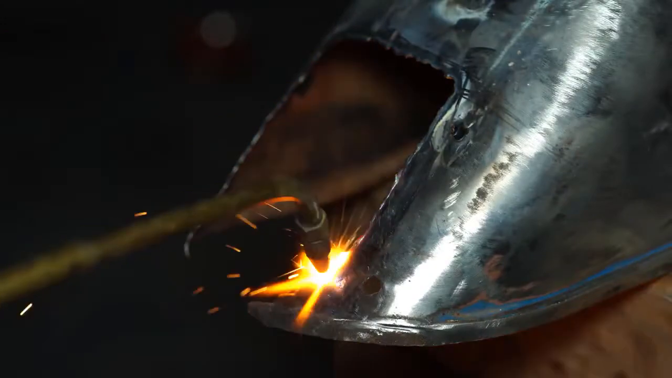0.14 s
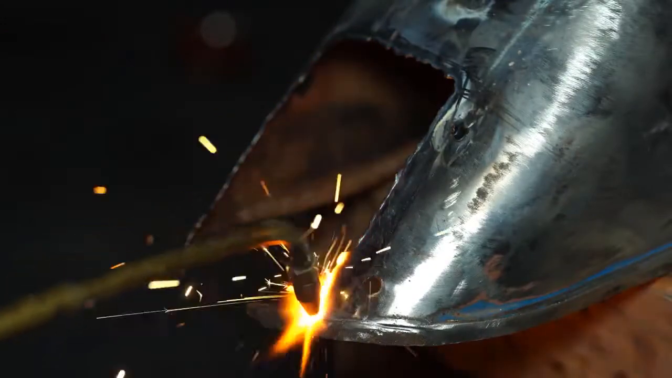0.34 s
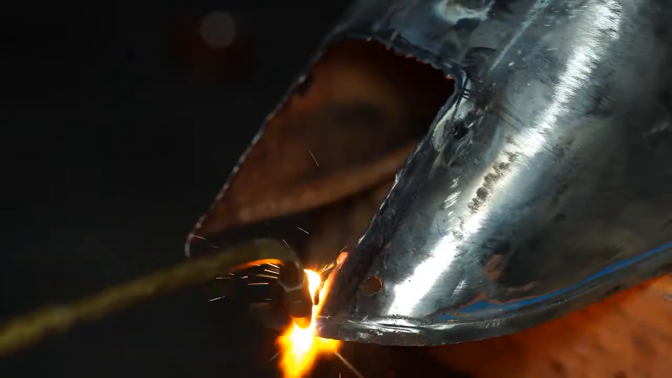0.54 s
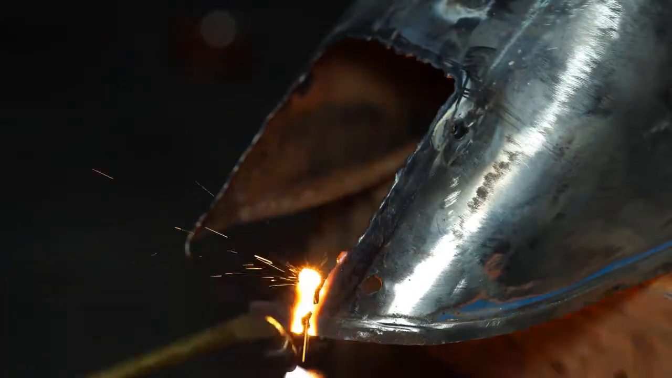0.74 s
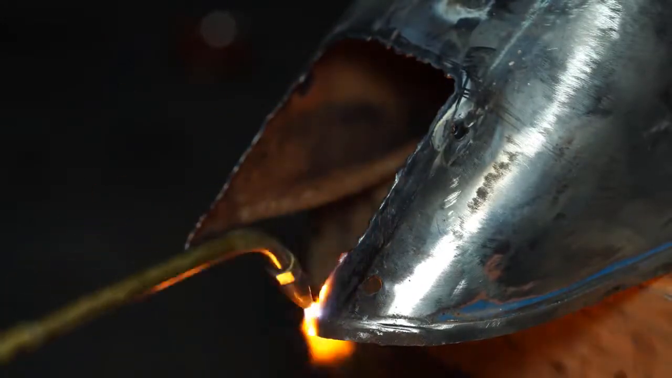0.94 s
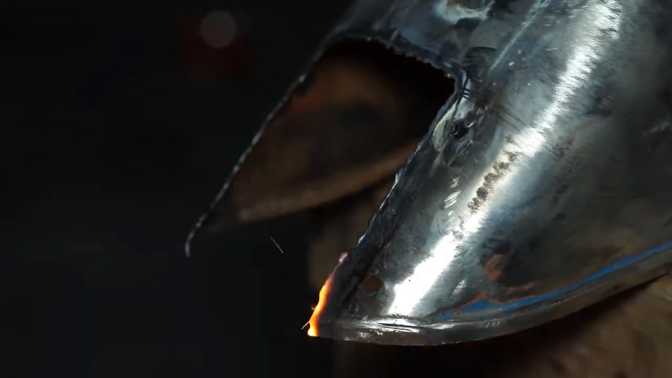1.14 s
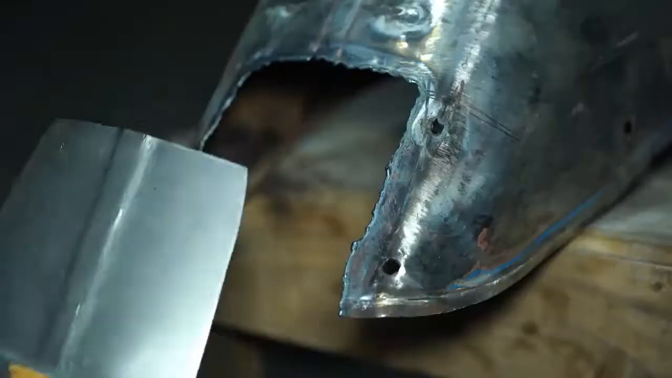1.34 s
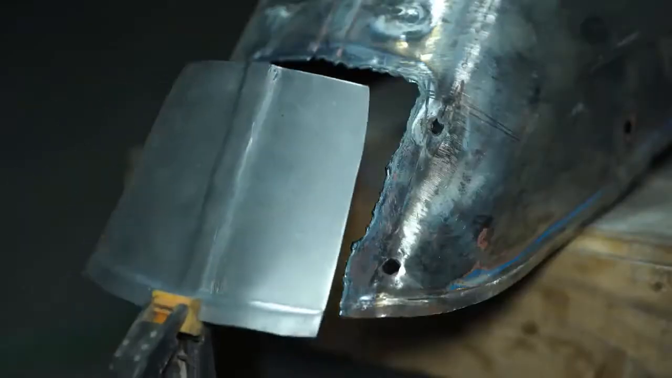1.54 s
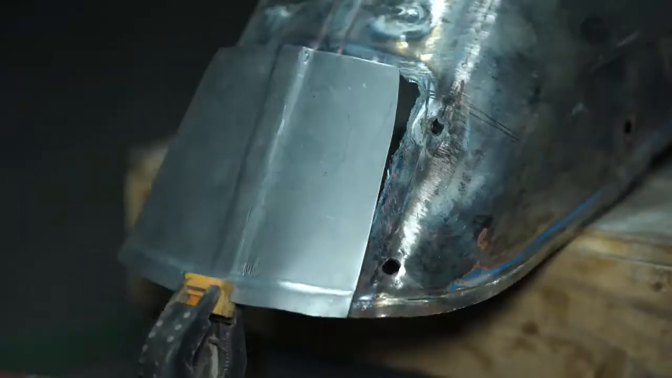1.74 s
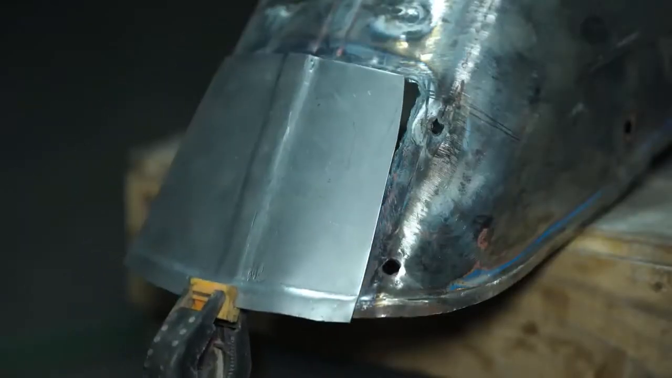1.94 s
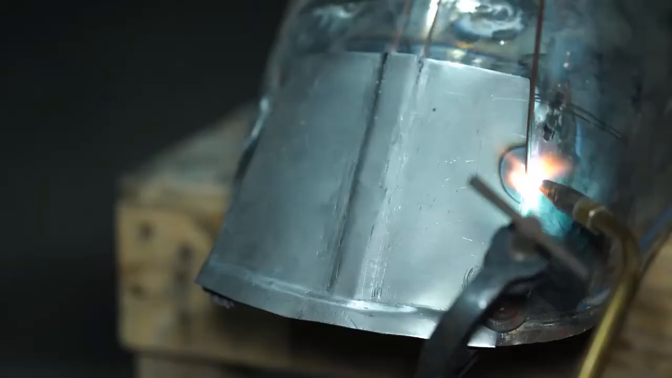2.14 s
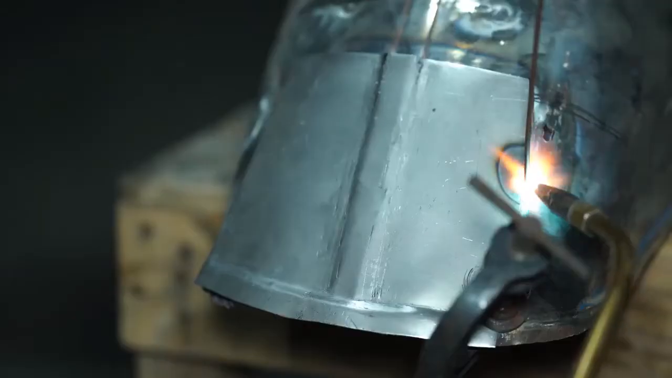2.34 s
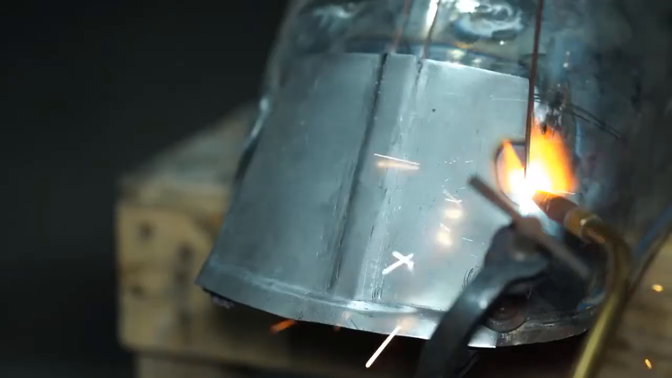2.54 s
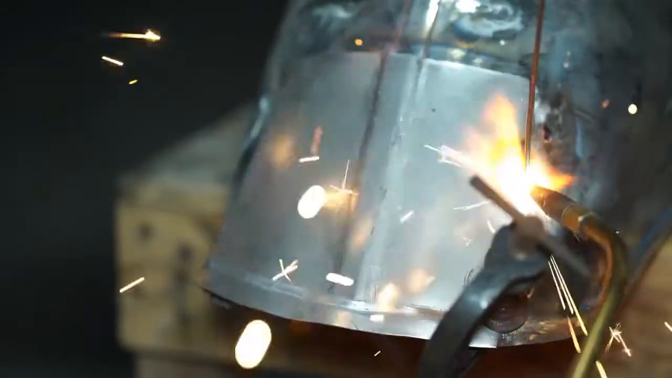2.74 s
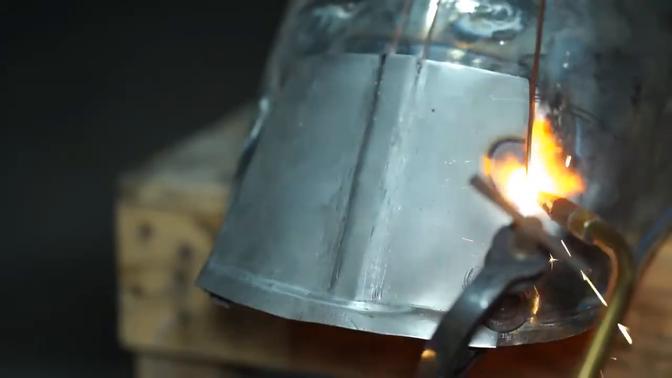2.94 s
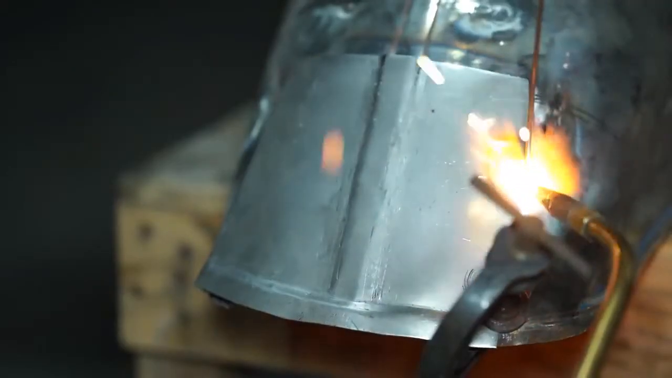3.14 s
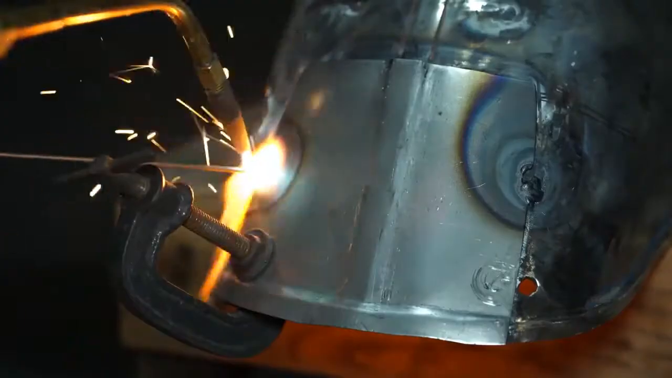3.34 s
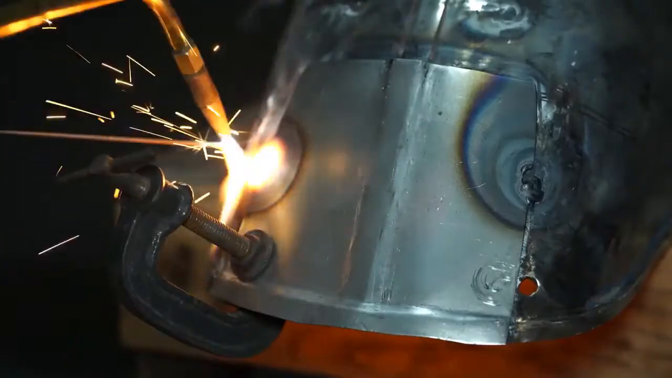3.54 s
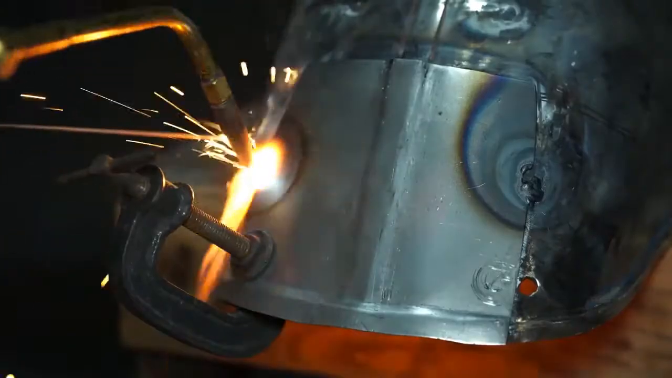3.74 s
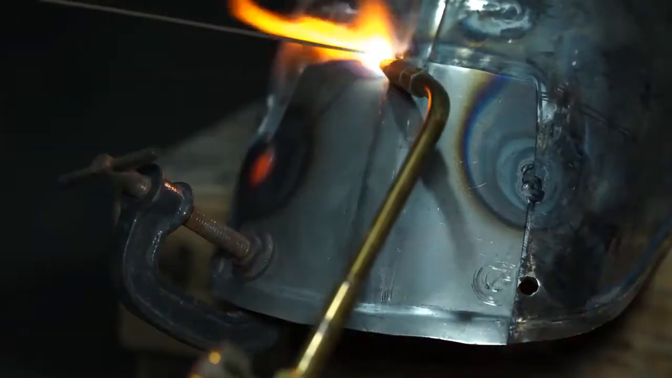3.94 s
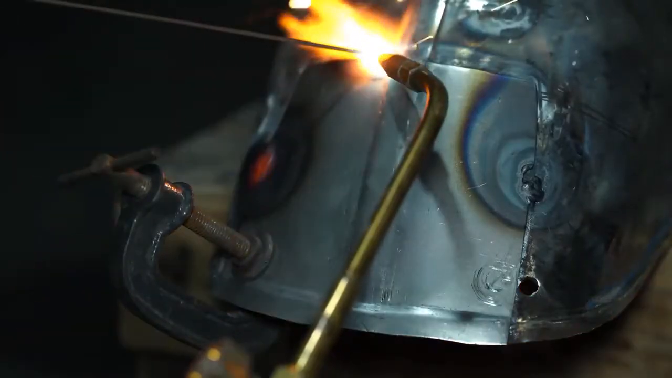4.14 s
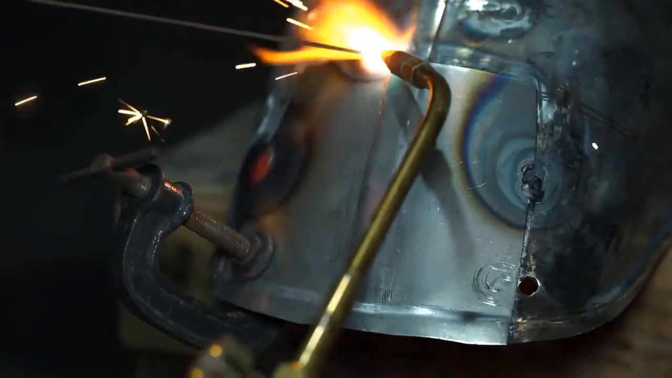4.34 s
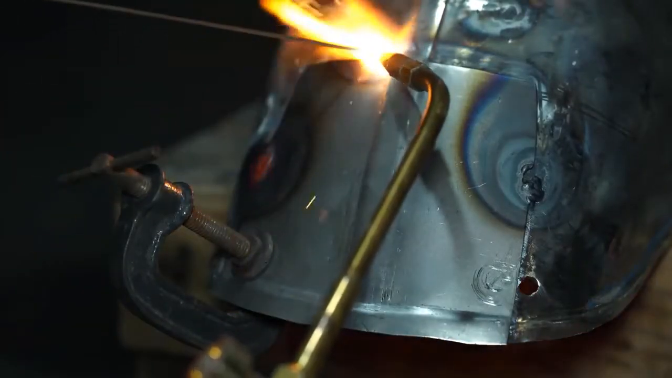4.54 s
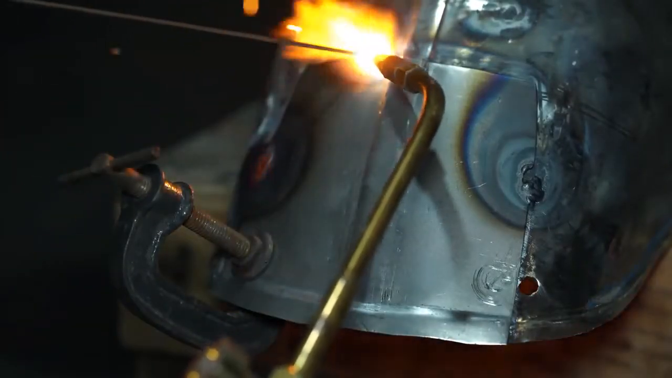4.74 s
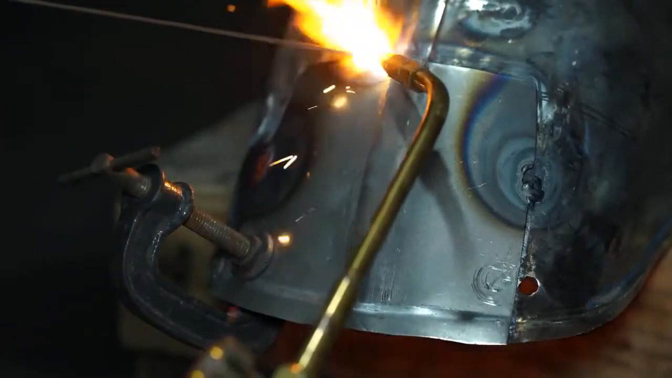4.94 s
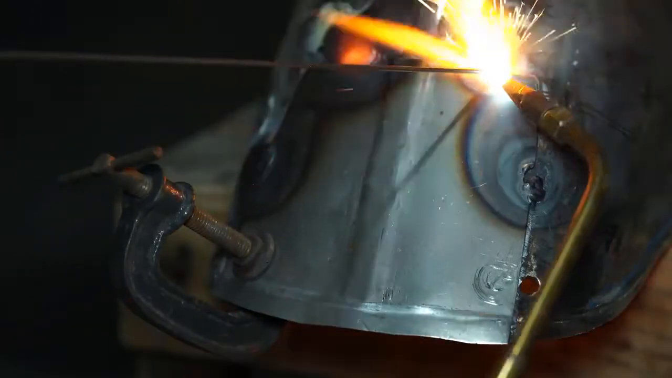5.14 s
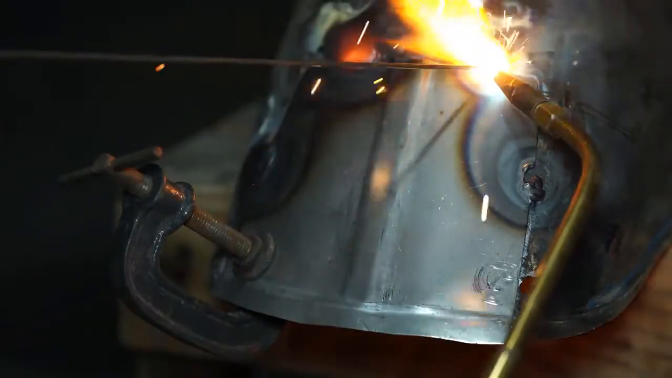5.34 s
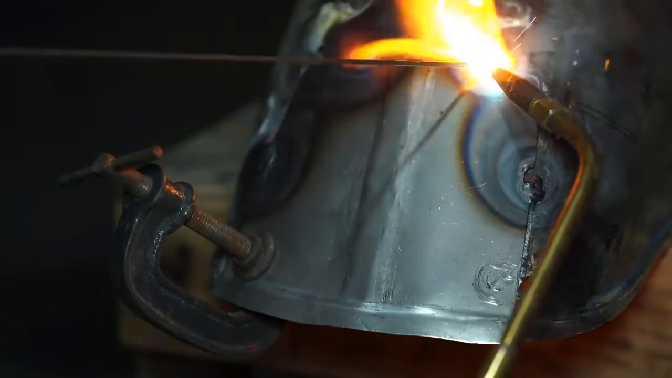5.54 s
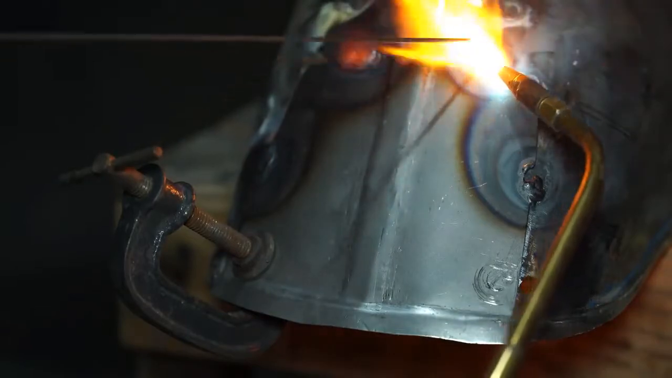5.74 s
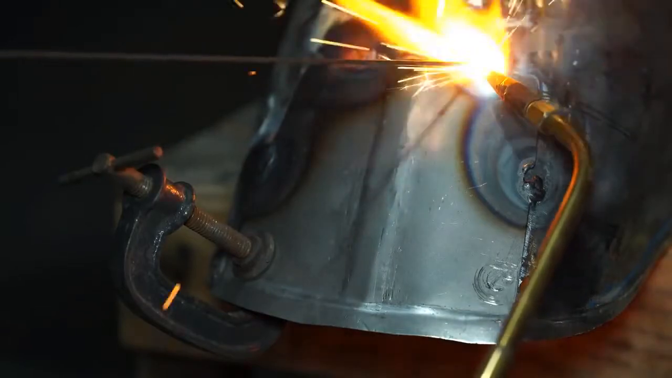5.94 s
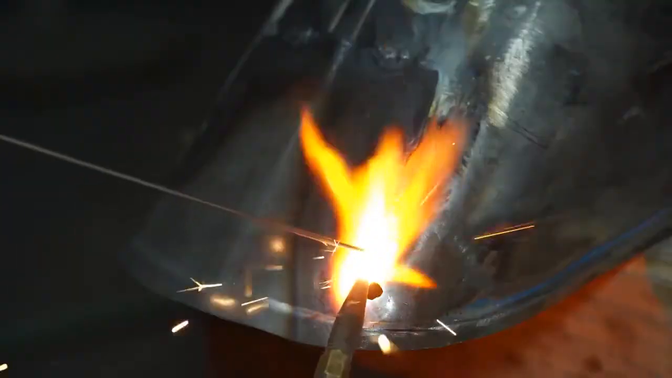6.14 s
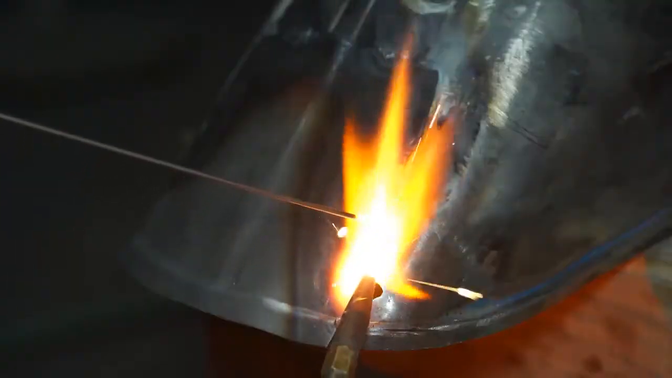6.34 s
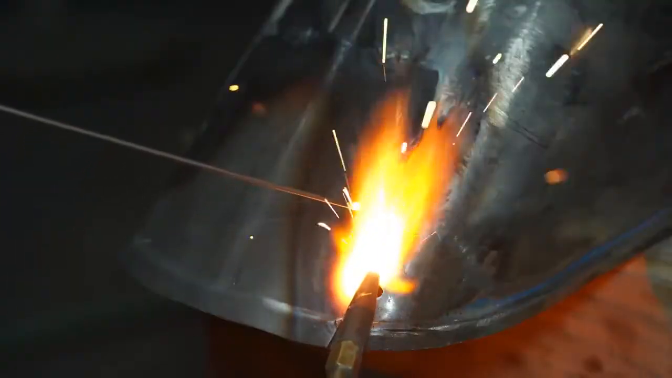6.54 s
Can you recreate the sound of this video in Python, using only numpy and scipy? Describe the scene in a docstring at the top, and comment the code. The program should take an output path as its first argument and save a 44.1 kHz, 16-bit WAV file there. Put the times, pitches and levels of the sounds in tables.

```python
"""In a workshop a gas torch is heard in eight short stretches spliced end to end: a small flame,
an oxygen blast cutting steel, a pause with the torch far off, then five welds. The jet is turbulent noise
coloured by panel resonances, with echoes; short tones in the blast and the welds hold, then die away.
Wavering sines give an electric machine's hum, low tones, thin whines and a nozzle whistle.
The microphone adds resonances, a narrow dip near 8 kHz and a limited band."""
import sys
import numpy as np
from scipy import signal
from scipy.fft import rfft, irfft, next_fast_len
from scipy.io import wavfile
from scipy.ndimage import uniform_filter1d

SR = 44100
rng = np.random.default_rng(int(sys.argv[2]) if len(sys.argv) > 2 else 0)


def bounce(signal):
    """Save signal as a 16-bit WAV file at the path given by the first command-line argument."""
    frames = np.transpose(np.atleast_2d(signal))
    limited = np.clip(frames, -1, 1)
    pcm = np.round(limited * 32767).astype(np.int16)
    wavfile.write(sys.argv[1], SR, pcm)


N = 290178

# Bounds of the stretches, where the torch jumps to a new position: (time [s])
SPLICE_TIMES = [0, .479, 1.357, 2.191, 3.25, 3.88, 5.135, 6.03, 6.58]
# Relative colour of the jet, one list a stretch: (frequency [Hz], level [dB])
JET_COLOUR = [
    [(59, -103), (100, -66), (832, -56), (1410, -25.5), (2020, -31), (3590, -19.5), (3900, -19),
     (4930, -19), (5960, -11), (7530, -1), (8190, -13), (8920, -5), (15800, -3)],
    [(59, -69), (100, -38.5), (224, -31), (301, -21), (673, -19.5), (1440, -5), (2070, -8), (2400, -2),
     (2720, -9.5), (3990, -2), (5360, -6), (7530, -7.5), (8190, -14), (9710, -9), (15800, -16.5)],
    [(59, -102), (100, -56), (288, -16), (460, -18), (780, -7.5), (1100, -10), (1190, -13.5), (1380, -14.5),
     (2500, -14.5), (4340, -12.5), (4930, -16), (13300, -24), (15800, -36)],
    [(59, -72), (100, -38), (271, -28), (301, -23), (380, -26.5), (687, -16.5), (944, -12), (1190, -7.5),
     (1470, -11.5), (2450, -7), (4160, -8.5), (4530, -8), (8020, -11.5), (10600, -10), (15800, -10)],
    [(59, -80), (100, -42), (327, -17), (479, -18.5), (533, -16), (605, -13), (886, -10.5), (1220, -8.5),
     (2250, -9), (3300, -8), (4160, -5.5), (4620, -5.5), (7850, -10.5), (10600, -7), (15800, -11)],
    [(59, -79), (100, -38.5), (295, -13), (717, -11), (1100, -3.5), (1170, -9.5), (1330, -9.5), (2500, -14),
     (2840, -13.5), (4720, -9.5), (5720, -15), (6350, -12.5), (7690, -16), (8550, -17.5), (15800, -11)],
    [(59, -72), (100, -44), (271, -30), (396, -22.5), (849, -19), (1190, -10), (1440, -9), (2450, -9),
     (2840, -11.5), (3160, -6.5), (5840, -8), (6770, -3), (8020, -10), (10600, -4.5), (15800, -3.5)],
    [(59, -71), (100, -33), (295, -9), (479, -13), (780, -6), (1100, -6.5), (1190, -11), (1270, -11),
     (1710, -11), (1860, -14), (2560, -13), (4160, -8), (8020, -11), (8550, -10.5), (15800, -11.5)],
]
# Resonances and dips of panel and cavity, one list a stretch: (centre [Hz], width [Hz], gain [dB])
PANEL_MODES = [
    [(1430, 150, 7), (2440, 460, -6), (3880, 300, 1), (5850, 400, 1), (8840, 350, 6), (10500, 300, -6)],
    [(1690, 350, 2.5), (2010, 130, -2), (2390, 290, 2.5), (3250, 200, 5), (3930, 300, 1), (4760, 250, 1.5),
     (6880, 400, -4), (7500, 370, 0.5)],
    [(4300, 220, 6.5), (8200, 350, 3), (11600, 700, 0)],
    [(2450, 250, 1.5), (4600, 400, 4.5), (8830, 300, 1.5), (10600, 830, 7), (11700, 500, -2),
     (12900, 300, 4)],
    [(1470, 140, 4), (2580, 200, 5.5), (3230, 250, 8.5), (4640, 400, 6), (9300, 590, -8), (14600, 900, -2)],
    [(2485, 260, 6), (3200, 160, 5), (4840, 110, 6), (5320, 200, 7.5), (6540, 380, 3), (8450, 220, 9.5),
     (10720, 400, 8.5), (12900, 400, 4)],
    [(2496, 290, 9.5), (3130, 180, 3.5), (4800, 170, 5.5), (6700, 430, 2.5), (9100, 200, 1),
     (10750, 550, 11), (11900, 500, -1), (13400, 660, 6)],
    [(2560, 280, 9), (3200, 200, 2), (4190, 285, 4.5), (4900, 230, 5), (8750, 220, -3), (12830, 520, 4),
     (14600, 900, -1)],
]
# Shock steepening of the jet, strong only in the oxygen blast, one a stretch: (cubic coefficient [1])
SHOCK_STEEPENING = [.01, 0.17, .01, 0.0092, .01, .01, .01, .01]
# Stereo spread in each position, added to the side signal's spectrum: (side lift [dB])
SIDE_LIFT = [-25.5, -5, 5, -0.5, 0, 1, -1.5, -0.5]
# Stereo spread over frequency, before each position's lift: (frequency [Hz], side over mid [dB])
SIDE_COLOUR = [(60, -12), (200, -26), (400, -49), (850, -21.5), (1290, -27.5), (2380, -13.5), (3600, -9),
               (4400, -5.5), (7600, -7.5), (8300, -16), (9800, -16), (11000, -7), (12500, -5), (15800, -8)]
# Flame at the start and end of each stretch, before swells and spits: (roar start [dB], roar end [dB],
# hiss start [dB], hiss end [dB], rumble start [dB], rumble end [dB])
FLAME_LEVELS = [(-51.5, -52.5, -39.5, -41, -91, -83), (-27.5, -27, -29, -30, -47.5, -48),
                (-41.5, -45, -48.5, -54.5, -52, -55), (-38, -39, -33.5, -32.5, -55.5, -54.5),
                (-38, -37.5, -35.5, -35.5, -54.5, -50.5), (-39.5, -40, -35, -33, -54, -51.5),
                (-39, -40.5, -33, -34.5, -54.5, -55), (-41, -38.5, -37, -37.5, -56.5, -55)]
# Gradual rises and falls of the flame, and the blast's short tail after the splice at 1.357 s:
# (peak time [s], rise [s], fall [s], roar lift [dB], hiss lift [dB], rumble lift [dB])
LEVEL_SWELLS = [(.13, .03, .012, 1, 3, 2), (.185, .01, .012, 0, -1, 17), (.37, 0.28, 0.074, -11, -9, -20),
                (.478, 0.038, .001, 8, 6, 22), (.57, .15, .09, -6.5, -1.5, -1.5),
                (.722, 0.037, 0.088, 1.5, -0.5, -1), (.98, 0.17, 0.018, -4.5, -2, -4.5),
                (1.357, .001, 0.022, 12, 15, 1), (1.62, .02, 0.055, 1, 2, 2), (1.754, 0.049, .02, 3, 4, -1),
                (2.03, .05, .1, 2.5, .5, -1), (2.7, .25, 0.25, -1.5, -.5, 0),
                (3.016, .006, 0.091, 2, -0.5, 0.5), (3.354, .08, 0.071, 2, 0.5, 0),
                (3.554, 0.08, 0.12, 6, -2, 3), (3.59, .015, .015, -2, -1, 2),
                (3.686, .03, 0.054, -1.5, -5, 1), (3.775, .03, .015, 2, 0, -1),
                (3.91, .02, 0.11, 1, 2, 8.5), (4.0, .05, 0.088, -1.5, 1, .5),
                (4.296, .06, .05, -1.5, 1, -1), (5.758, 0.065, 0.028, 4.5, 2, 0),
                (5.85, .06, .04, -1.5, 0, -1), (5.93, .07, 0.045, -0.5, 2.5, 0),
                (6.222, .012, 0.2, 2.5, 0, 2.5), (6.418, .02, 0.064, 2, .5, 3.5)]
# The flame spits or sags: (time [s], length [s], roar lift [dB], hiss lift [dB])
FLAME_SPITS = [(0.064, 0.0072, 3, 6), (0.075, 0.069, 3, 8.5), (0.145, 0.035, 3.5, 9.5),
               (0.24, 0.011, 2, 8.5), (0.293, 0.0093, 7, 7), (.33, 0.011, 5, 6.5), (0.422, 0.011, 4, 7),
               (0.841, 0.16, -2, -1.5), (1.508, 0.0062, 6.5, 3), (1.62, .015, 0, 2), (1.761, .02, 0.5, 0),
               (3.018, 0.0032, 8.5, 2), (3.506, 0.092, 0.5, 0.5), (5.615, 0.014, 2, 1),
               (5.75, .02, -1, -0.5)]
# Short tones in the blast and the welds, each holding, then dying away:
# (time [s], mean frequency [Hz], level [dB], hold [s], decay by 60 dB [s])
SHORT_TONES = [(1.17, 1580, -40, .08, .1), (1.22, 5150, -39, 0.059, .1), (3.275, 545, -54, 0.13, .08),
               (3.25, 1500, -48.5, 0.095, 0.19), (3.32, 4700, -42, .05, .2), (3.515, 550, -55, .06, 0.089),
               (3.51, 1800, -48, 0.048, 0.18), (5.735, 1740, -46.5, 0.028, 0.089),
               (6.398, 1570, -47, 0.021, .1), (6.415, 1700, -44, 0.049, 0.18)]
# The machine's loudest overtones: (multiple of the fundamental [1])
OVERTONES = (23, 24, 25)
# The machine's fundamental, one a stretch: (frequency [Hz])
FUNDAMENTALS = [50, 50, 50.3, 50.55, 50.05, 50.33, 50.55, 50.35]
# Mean levels of the three overtones: (time [s], first [dB], second [dB], third [dB])
OVERTONE_LEVELS = [(.48, -58, -62, -65), (1.37, -57, -51, -58), (1.66, -64, -61, -62),
                   (1.95, -56, -45.5, -57), (2.2, -56.5, -52.5, -60), (2.4, -47, -48, -57),
                   (2.9, -53, -51, -56), (3.07, -63.5, -61, -55), (3.3, -58, -50, -58),
                   (3.45, -60, -62, -65), (3.85, -65, -47.5, -60), (3.92, -49, -50, -60),
                   (4.3, -51.5, -53, -68), (4.8, -49.5, -48, -53), (5.09, -47.5, -48.5, -59),
                   (5.15, -60, -66, -57), (5.37, -48.5, -47, -53), (5.82, -56, -62, -54.5),
                   (6.02, -49, -48.5, -60), (6.26, -66, -48.5, -69), (6.58, -58, -48.5, -66)]
# Low tones that come and go behind the torch:
# (time [s], length [s], first frequency [Hz], last frequency [Hz], mean level [dB])
LOW_TONES = [(.55, 0.34, 313, 298, -57.5), (.6, .28, 360, 355, -62), (1.0, 0.35, 265, 275, -64.5),
             (1.6, 0.34, 300, 295, -66), (2.796, 0.53, 309, 309, -70), (3.48, 0.28, 335, 325, -64.5),
             (3.9, .8, 272, 338, -59.5), (4.08, .16, 418, 412, -65), (4.35, .7, 368, 422, -61.5),
             (4.45, 0.37, 822, 798, -59), (4.7, .35, 880, 870, -62), (4.85, 0.23, 283, 282, -60),
             (6.24, 0.35, 305, 300, -66)]
# Thin tones beside the small flame: (mean frequency [Hz], mean level [dB], end time [s])
WHINE_TONES = [(1460, -65, 0.22), (3800, -66.5, .3), (3994, -65, 0.219), (5744, -62, .479),
               (5980, -60, 0.53), (13324, -60, .479), (13571, -56, .479)]
# Nozzle whistle while welding: (mean frequency [Hz], mean level [dB])
WHISTLE_TONES = [(8737, -64), (8791, -53)]
# Colour of the microphone housing: (centre [Hz], width [Hz], gain [dB])
MIC_MODES = [(8070, 420, -7.5), (9740, 700, -1), (11520, 640, -2.5), (15200, 700, -5.5), (15500, 500, 6)]

ECHO_DB, ECHO_T60_S = -6.5, .12  # reflections from bench and walls
SHIFT_HZ = 1.2  # how fast the moving torch turns the echo pattern
DRONE_FADE = 0.27  # share of a tone's length spent fading in, and again out
TOP_HZ = 15850  # upper limit of the microphone's band


def torch(t):
    """Superposition in sequence: each stretch of jet noise is laid between its splices."""
    out = np.zeros((2, N))
    bounds = np.minimum(np.round(np.array(SPLICE_TIMES) * SR).astype(int), N)
    stretches = zip(bounds, bounds[1:], FLAME_LEVELS, JET_COLOUR, PANEL_MODES, SHOCK_STEEPENING, SIDE_LIFT)
    for a, b, *settings in stretches:
        edge = signal.windows.tukey(b - a, .001 * SR / (b - a))  # 0.5 ms fade at each end
        out[:, a:b] = jet(t[a:b], *settings) * edge
    return out


def jet(t, flame, colour, panel, steepening, side_lift_db):
    """Turbulent mixing radiates broadband noise; its bands surge together and flicker alone (mid, side)."""
    size = next_fast_len(len(t))
    hz = np.maximum(np.arange(size // 2 + 1) * SR / size, 1)
    resonance_db = sum(bump(hz, *mode) for mode in panel)
    shape = undb(on_log(hz, colour) + resonance_db)
    side_gain = undb(on_log(hz, SIDE_COLOUR) + side_lift_db)

    noise = turbulence(size, steepening)
    spectrum = rfft(echoes(noise)) * shape * [np.ones_like(hz), side_gain]

    first, last = np.reshape(flame, (3, 2)).T
    roar_db, hiss_db, rumble_db = np.linspace(first, last, len(t), axis=1) + swells(t)
    roar_spit, hiss_spit = spits(t)
    surge = walk(len(t), 14.2)
    layers = ((30, 1200, rumble_db, 0),
              (1200, 6000, roar_db, roar_spit),
              (6000, 20000, hiss_db, hiss_spit))
    out = 0
    for low, high, db, spit in layers:
        layer = 0
        edges = np.geomspace(low, high, num=5)  # four bands of equal ratio
        for a, b in zip(edges, edges[1:]):
            band = irfft(spectrum * ((hz >= a) & (hz < b)), size)[:, :len(t)]
            flicker = walk(len(t), 20.4)
            layer = layer + band * undb(0.24 * surge + 0.85 * flicker)
        unit_layer = layer / layer[0].std()  # the mid sets the level
        out = out + unit_layer * undb(db + spit)
    return out


def turbulence(size, steepening):
    """Eddies come in bursts, and nonlinear propagation steepens the mid's compressions into spikes."""
    noise = rng.standard_normal((2, size)) * undb(0.81 * walk(size, 600))
    push = signal.lfilter([.5, .5], 1, noise[0])
    noise[0] += steepening * push ** 3 * (push > 0)
    return noise


def swells(t):
    """Level envelope: straight dB rises and falls of roar, hiss and rumble."""
    lift = 0
    for peak, rise, fall, *lift_db in LEVEL_SWELLS:
        course = np.interp(t, [peak - rise, peak, peak + fall], [0, 1, 0])
        lift = lift + np.outer(lift_db, course)
    return lift


def spits(t):
    """Unsteady burning: sudden dB steps of roar and hiss, with edges of about 1 ms."""
    lift = 0
    for start, length, roar_db, hiss_db in FLAME_SPITS:
        active = (t > start) & (t < start + length)
        lift = lift + np.outer([roar_db, hiss_db], active)
    return uniform_filter1d(lift.astype(float), size=45)


def echoes(x):
    """Reverberation: direct sound plus a decaying random tail turning between two patterns as the torch moves."""
    size = x.shape[1]
    age = np.arange(size) / SR
    decay = undb(-60 * age / ECHO_T60_S) * (age > .003)  # echoes start after 3 ms
    tails = rng.standard_normal((2, 1, size)) * decay
    unit_tails = tails / np.linalg.norm(tails[0])
    first, second = irfft(rfft(unit_tails) * rfft(x), size)
    turn = 2 * np.pi * SHIFT_HZ * age
    return x + undb(ECHO_DB) * (np.cos(turn) * first + np.sin(turn) * second)


def short_tones(t):
    """Exponential decay: each wavering sine rises in 13 ms, holds, then dies away."""
    out = 0
    for start, hz, db, hold, t60 in SHORT_TONES:
        age = np.maximum(t - start, 0)
        attack = np.minimum(age / 0.013, 1)
        decay = undb(-60 * np.maximum(age - hold, 0) / t60)
        out = out + tone(hz, db, 0.0057 * hz) * attack * decay
    return out


def whistle(t):
    """Narrowband nozzle tones: two sines wavering about fixed pitches, from the first weld on."""
    tones = sum(tone(hz, db + 3 * walk(N, 3.61), 3.06) for hz, db in WHISTLE_TONES)
    return tones * (t > SPLICE_TIMES[3])


def whine(t):
    """Narrowband tones: thin sines waver about fixed pitches, each fading over its last 4 ms."""
    out = 0
    for hz, db, end in WHINE_TONES:
        fade = np.clip((end - t) / .004, 0, 1)
        out = out + tone(hz, db + 3.0 * walk(N, 15), 2.6) * fade
    return out


def machine_hum(t):
    """Harmonic series: three wavering overtones of one fundamental, heard after the small flame."""
    times, *levels = np.transpose(OVERTONE_LEVELS)
    base_hz = np.array(FUNDAMENTALS)[np.searchsorted(SPLICE_TIMES[1:-1], t)]
    out = 0
    for order, db in zip(OVERTONES, levels):
        level_db = np.interp(t, times, db) + 1.2 * walk(N, 25.11)
        out = out + tone(order * base_hz, level_db, 1.503)
    return out * (t > SPLICE_TIMES[1])


def drones(t):
    """Gliding sinusoids: wavering tones move linearly in frequency and fade in and out."""
    out = 0
    for start, length, first_hz, last_hz, db in LOW_TONES:
        done = np.clip((t - start) / length, 0, 1)
        fade = np.minimum(np.minimum(done, 1 - done) / DRONE_FADE, 1)
        hz = first_hz + (last_hz - first_hz) * done
        out = out + tone(hz, db + 2.9 * walk(N, 25.05), 6.98) * fade
    return out


def tone(hz, db, waver_hz):
    """Frequency modulation: a sine of rms level db whose phase integrates a wavering frequency."""
    hz = hz + waver_hz * walk(N, 12)
    cycles = np.cumsum(hz) / SR + rng.random()
    return np.sqrt(2) * undb(db) * np.sin(2 * np.pi * cycles)


def bump(hz, centre_hz, width_hz, db):
    """Resonance: a bell in dB, halved at half the width from its centre."""
    return db / (1 + (2 * (hz - centre_hz) / width_hz) ** 2)


def on_log(hz, table):
    """Spectral interpolation: a (frequency [Hz], value) table read on a log-frequency axis."""
    at, value = np.transpose(table)
    return np.interp(np.log(hz), np.log(at), value)


def walk(size, rate):
    """Low-pass fluctuation: random levels held 1 / rate s and smoothed twice; spread near 1."""
    k = int(SR / rate)
    held = np.repeat(rng.standard_normal(size // k + 1), k)
    return 1.26 * uniform_filter1d(uniform_filter1d(held, k), k)[:size]


def undb(db):
    """Logarithmic level: decibels turned into an amplitude ratio."""
    return 10 ** (np.asarray(db) / 20)


def scene():
    """Superposition: all sources add in the mid, and the torch alone has a side signal."""
    t = np.arange(N) / SR
    mid, side = torch(t)
    mid = mid + short_tones(t) + whistle(t) + whine(t) + machine_hum(t) + drones(t)
    return np.array([mid + side, mid - side])


def record(dry):
    """Linear filtering: the microphone's resonances, then a cut of the lowest bass and the steep cut at the
    top."""
    size = next_fast_len(N)
    hz = np.arange(size // 2 + 1) * SR / size
    response = undb(sum(bump(hz, *mode) for mode in MIC_MODES))
    coloured = irfft(rfft(dry, size) * response, size)[:, :N]
    bass_cut = signal.butter(2, 90, "high", fs=SR, output="sos")
    top_cut = signal.ellip(12, .2, 75, TOP_HZ, fs=SR, output="sos")
    thin = signal.sosfilt(bass_cut, coloured)
    return signal.sosfilt(top_cut, thin)


dry = scene()
out = record(dry)
bounce(out)
```